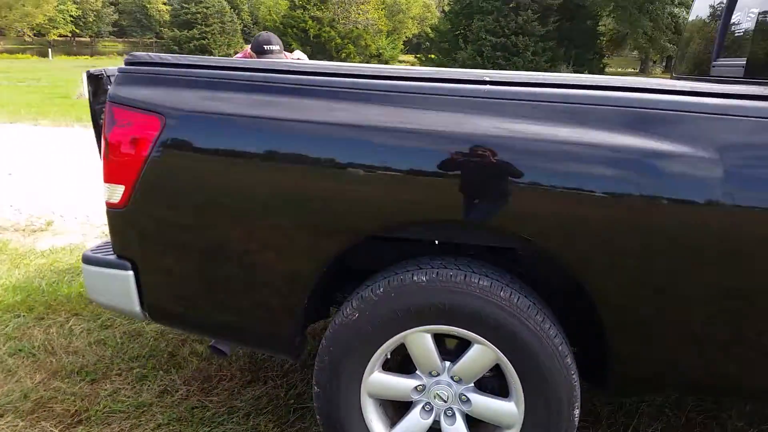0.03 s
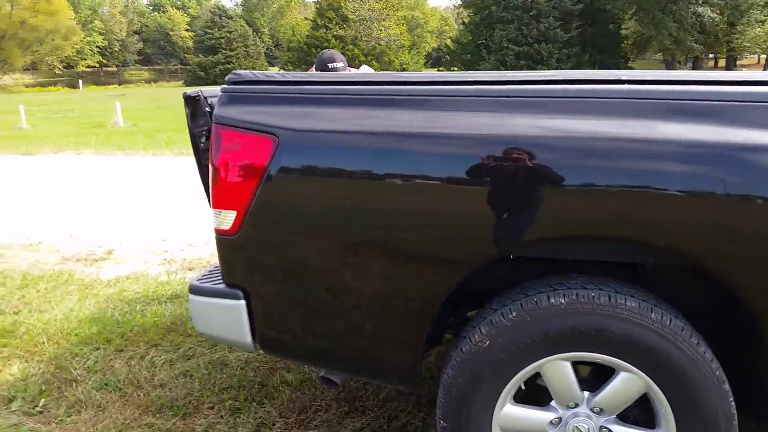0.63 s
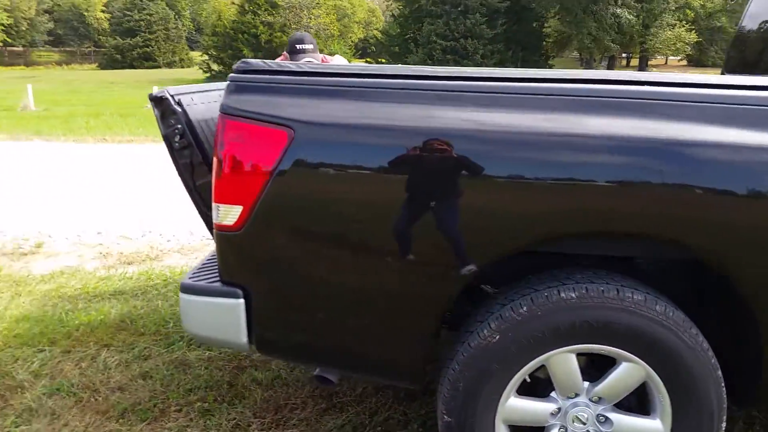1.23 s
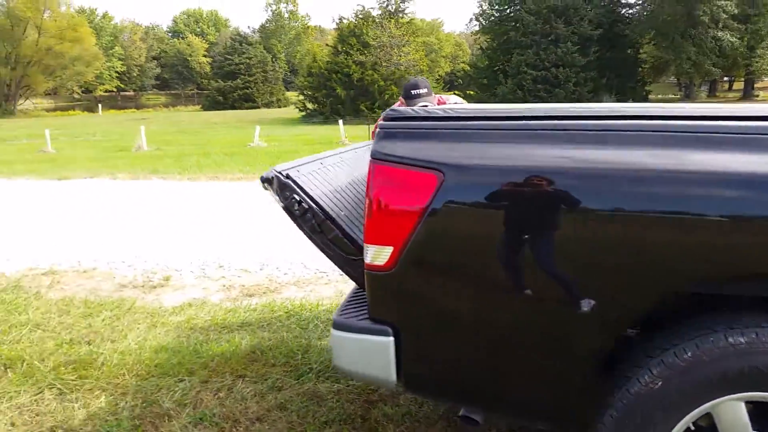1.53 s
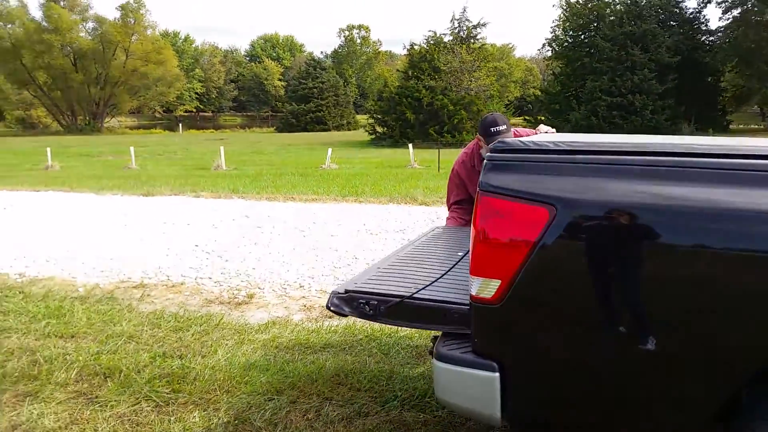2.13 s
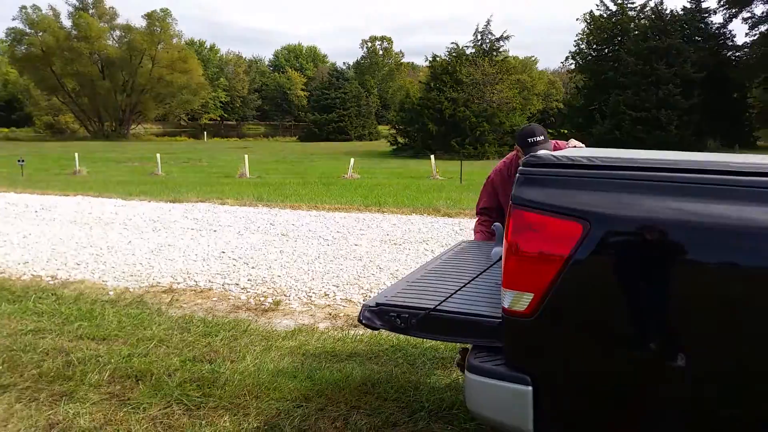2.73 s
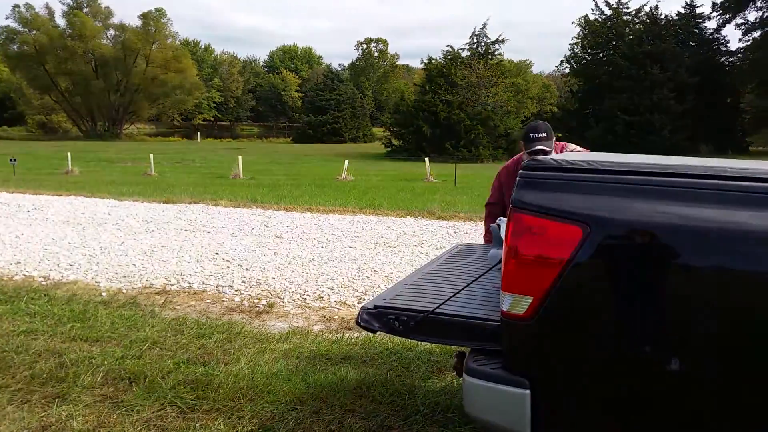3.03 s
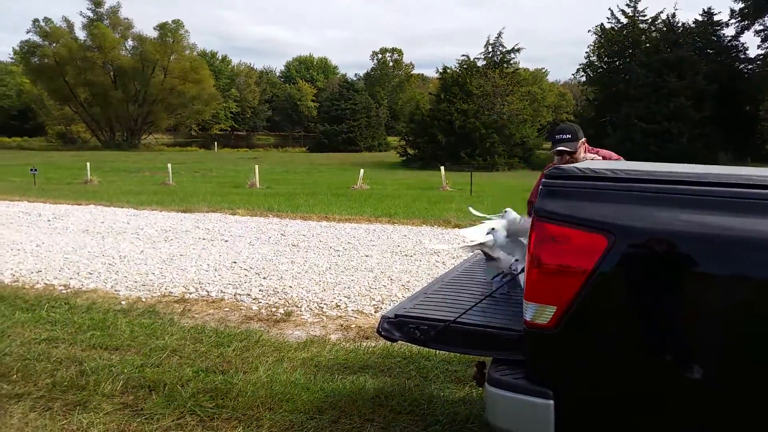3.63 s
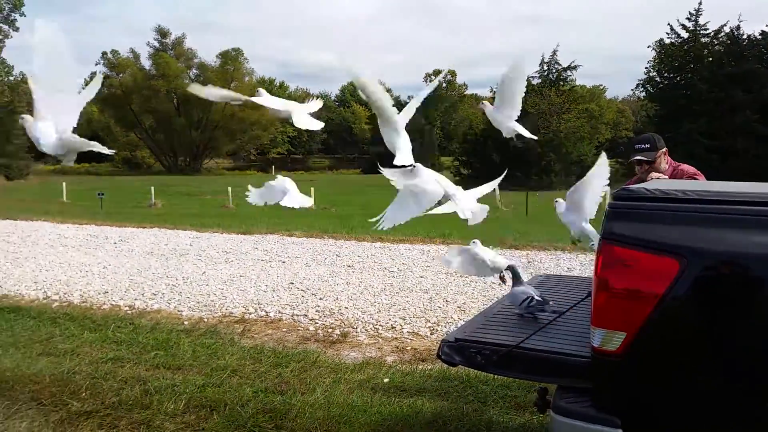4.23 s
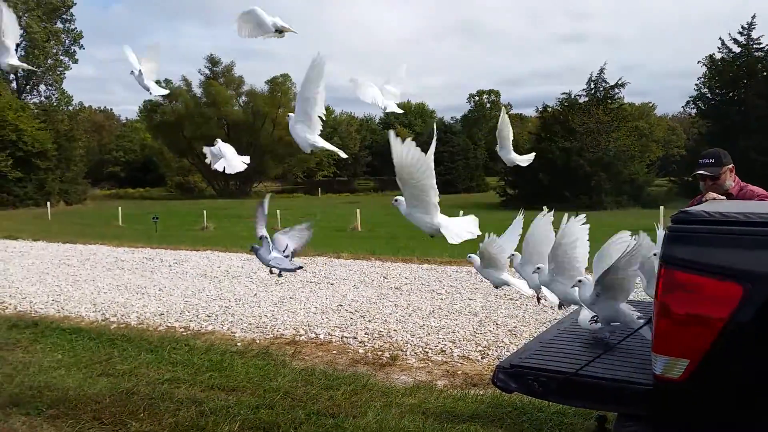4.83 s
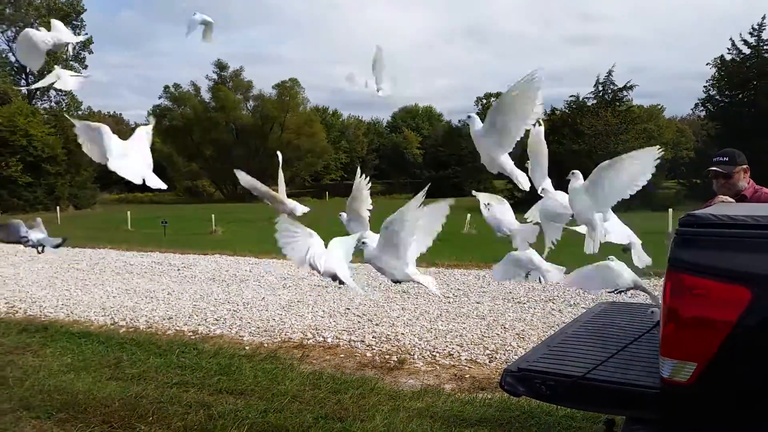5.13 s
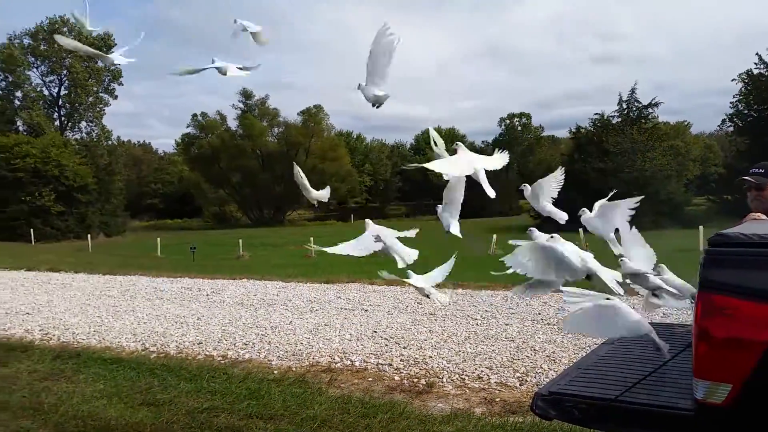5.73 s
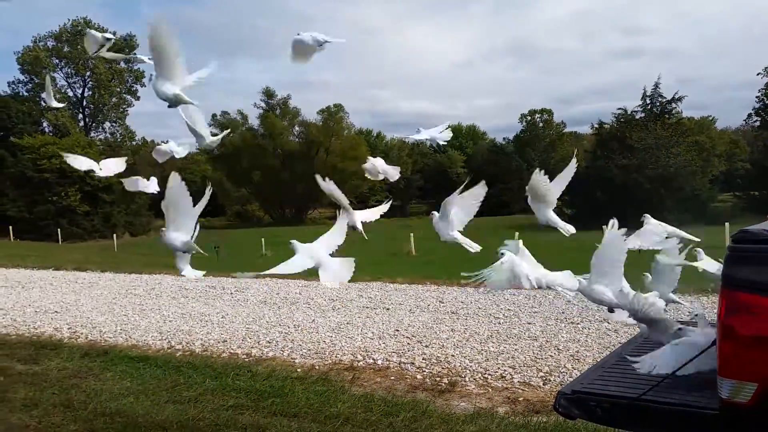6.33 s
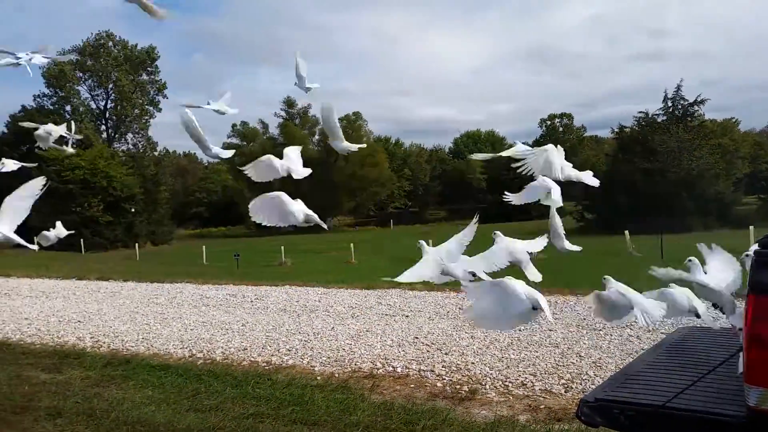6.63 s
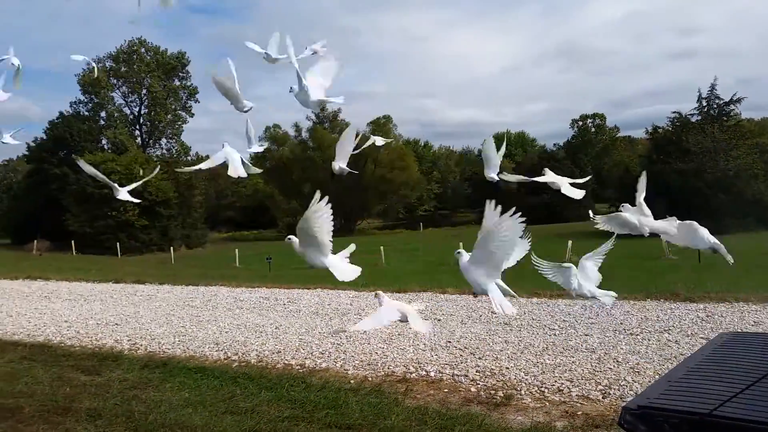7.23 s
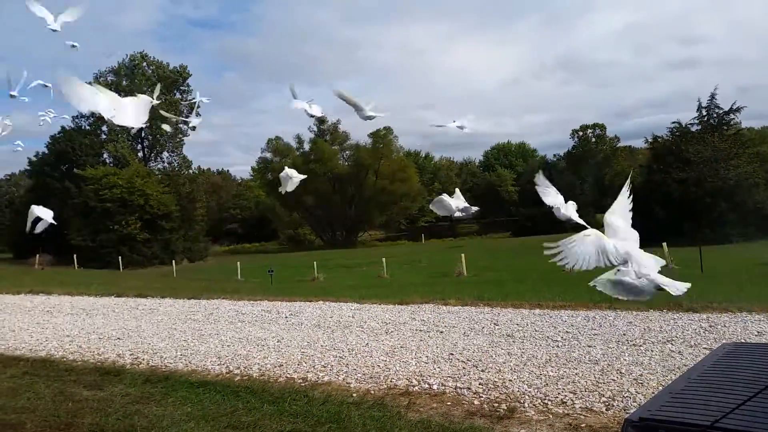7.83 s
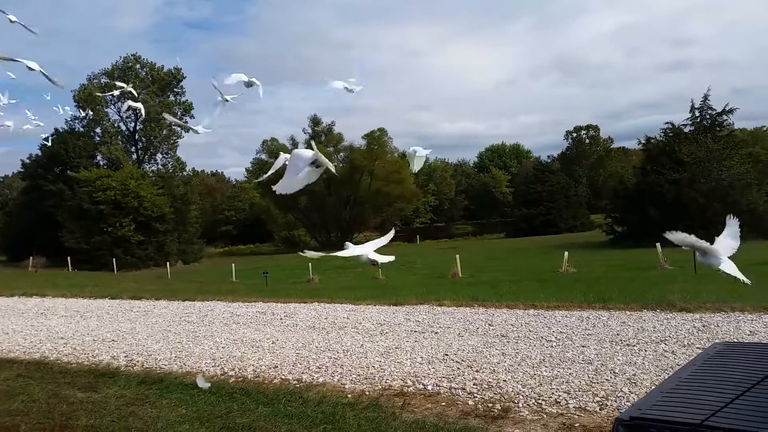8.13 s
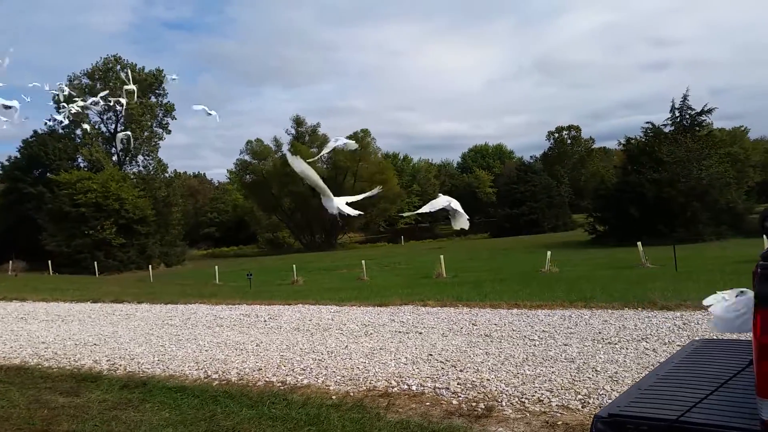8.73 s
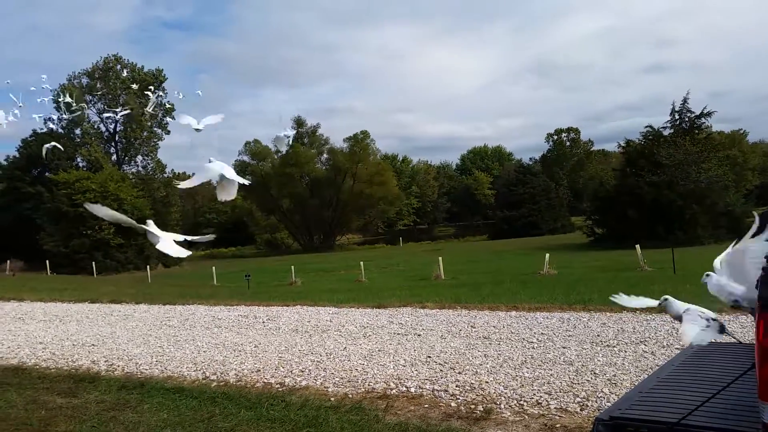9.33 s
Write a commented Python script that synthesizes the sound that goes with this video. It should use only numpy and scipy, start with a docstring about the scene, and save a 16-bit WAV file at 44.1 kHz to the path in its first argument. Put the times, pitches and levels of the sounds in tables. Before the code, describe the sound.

Wind buffets the microphone outdoors while a tailgate knocks, then a flock of doves bursts out with dense flapping and sharp wing claps.

```python
"""A flock of doves bursts out of a pickup's bed: feathers hiss, wings push air, wing tips clap.
Before that, steps swish through the lawn, small metal parts clink and the lowered tailgate knocks to rest.
Gusts sweep eddies past the two ports of a handheld microphone throughout; one port sounds full,
the other thin and glassy. Far trees and faint insects lie underneath."""
import sys
import numpy as np
from scipy import signal
from scipy.fft import rfft, irfft, next_fast_len
from scipy.io import wavfile
from scipy.ndimage import uniform_filter1d

SR = 44100
rng = np.random.default_rng(int(sys.argv[2]) if len(sys.argv) > 2 else 0)


def dump_mix(stems):
    """Bounce the given channels to the path in sys.argv[1] as a 16-bit WAV at rate SR."""
    frames = np.atleast_2d(stems).T  # one column per channel
    limited = np.clip(frames, -1, 1)  # hard clip at full scale
    pcm = np.round(limited * 32767).astype(np.int16)
    wavfile.write(sys.argv[1], SR, pcm)


N = 414099
TIME = np.arange(N) / SR


# birds leaving in waves: t/s, level/dB
FLOCK_LEVEL = [(3.681, -52), (3.85, -36.5), (4.03, -31.5), (4.7, -33.5), (5.13, -30), (5.5, -30),
               (6.101, -39.5), (6.42, -33.5), (6.72, -37), (7.2, -29.5), (7.64, -33), (8.1, -42),
               (8.56, -52.5), (8.74, -46.5), (9.1, -55), (9.39, -51)]
# feather hiss: f/Hz, density/dB
FEATHER_SPECTRUM = [(700, -30), (1800, -2), (3500, -2), (7000, -2.5), (16000, -4.5)]
# air pushed by the wings: f/Hz, density/dB
PUFF_SPECTRUM = [(80, -7.5), (250, 11), (430, 1.5), (720, 4), (1000, -2.5), (2200, -9.5), (6000, -16)]

def flock(hiss_gain_db=3, air_gain_db=1.5, flick_s=0.001, sweep_s=0.016, puff_s=0.0086, full_db=-32):
    """Each stroke flicks the quills, sweeps the feathers over one another and pushes a puff of air."""
    hiss_db = on_timeline(FLOCK_LEVEL)
    air_db = full_db + 0.81 * (hiss_db - full_db)  # swells less than the hiss
    airborne = np.interp(TIME, [3.6, 3.76], [0, 1])
    strokes = wingbeats()
    far_birds = .35 * strokes.mean()
    rustle = decay(0.15 * strokes + decay(strokes, sweep_s), flick_s) + far_birds
    barbs = grain(depth_db=5, tau_s=0.0022)  # feather edges catch and slip
    hiss = colour(air_noise() * np.sqrt(rustle) * barbs, FEATHER_SPECTRUM)
    hiss = even_out(unit_rms(hiss), span_s=0.048)
    puffs = np.sqrt(decay(decay(strokes, puff_s), flick_s) + far_birds)
    air = colour(air_noise(alike_below_hz=1460) * puffs, PUFF_SPECTRUM)
    air = even_out(unit_rms(air), span_s=0.067)
    return airborne * (from_db(hiss_db + hiss_gain_db) * hiss + from_db(air_db + air_gain_db) * air)


def wingbeats(birds=7, beat_hz=8.5, spread_db=3.5):
    """One power impulse per downstroke of the nearest birds, each on its own uneven beat."""
    strokes = np.zeros(N)
    for _ in range(birds):
        jitter, size = rng.standard_normal((2, N // SR * 20))
        beats = np.cumsum(1 + 0.0738 * jitter) - rng.random()
        at = (beats * SR / (beat_hz * rng.uniform(.85, 1.15))).astype(int)
        heard = (at >= 0) & (at < N)
        strokes[at[heard]] += from_db(spread_db * size[heard]) ** 2
    return strokes


# loudest wing claps: t/s, level/dB, crack decay/s
WING_CLAPS = [(3.7542, -19.5, 0.0005), (3.902, -19, 0.00055), (4.0038, -14, 0.0005), (4.0478, -12, 0.00051),
              (4.0976, -10, 0.00055), (4.24, -7, 0.00055), (4.2608, -8, 0.00055), (4.3352, -9.5, 0.00048),
              (4.4815, -12, 0.00055), (4.561, -12.5, 0.00063), (4.586, -12.5, 0.00061),
              (4.6722, -9.5, 0.00055), (4.8295, -10, 0.00055), (4.9141, -9.5, 0.00055),
              (4.9836, -10, 0.00055), (5.057, -12, 0.00041), (5.3133, -12, 0.00048),
              (5.5001, -10.5, 0.00044), (5.7395, -14, 0.00059), (5.8245, -11, 0.00046),
              (6.0415, -12, 0.00061), (6.871, -13.5, 0.00055), (6.927, -15, 0.00046),
              (6.9988, -8.5, 0.00044), (7.1933, -11.5, 0.00055), (7.2624, -10.5, 0.0006),
              (7.3327, -10, 0.00055), (7.3781, -14, 0.00055), (7.477, -13.5, 0.0006),
              (7.651, -15.5, 0.00072), (7.7937, -11, 0.00055), (7.897, -14.5, 0.00042),
              (7.9473, -15, 0.00048), (8.1295, -14, 0.00046), (8.1998, -21.5, 0.00049),
              (8.411, -24.5, 0.00055), (8.4414, -23, 0.00065), (8.8545, -26, 0.00055),
              (9.068, -28.5, 0.00055)]
# crack and rustle: f/Hz, gain/dB
CLAP_SPECTRUM = [(300, -3.5), (2000, -9), (5000, 5), (16000, 1)]
# air trapped between wings: f/Hz, density/dB
SLAP_SPECTRUM = [(100, -5), (280, 0.5), (700, 4.5), (1100, -3), (2300, 1.5), (5000, -18.5)]

def wing_claps(gain_db=6, pan_db=2, rustle_s=0.003, echo_s=0.0038, echo_db=-13, slap_s=0.0077):
    """Wing tips meet: a crack, a rustle, a hollow slap of trapped air, an echo off gate or ground."""
    cracks, slaps, t = np.zeros((2, N)), np.zeros(N), TIME[:SR // 20]
    noise = air_noise()
    claps = list(WING_CLAPS) + light_claps()
    draws = rng.standard_normal((N // len(t), 3))
    for k, ((start, db, crack_s), (path, cupped, pan)) in enumerate(zip(claps, draws)):
        power = np.exp(-2 * t / crack_s) + 0.031 * np.exp(-t / rustle_s)
        bursts = np.sqrt(power) * noise[:, k * len(t):(k + 1) * len(t)]
        add(slaps, start, from_db(db - 19 + 3 * cupped) * np.exp(-t / slap_s))
        for side, burst, sign in zip(cracks, bursts, (1, -1)):
            burst = from_db(db + gain_db + sign * pan_db * pan) * burst / np.abs(burst).max()
            add(side, start, burst)
            add(side, start + echo_s * np.exp(0.23 * path), from_db(echo_db) * burst)
    return colour(cracks, CLAP_SPECTRUM) + slaps * unit_rms(colour(noise, SLAP_SPECTRUM))


def light_claps(per_s=8.4, boost_db=15.5, spread_db=2, crack_s=0.0014, step_s=0.01):
    """Lighter wing touches at random, following the flock's level; rows as in WING_CLAPS."""
    times, levels = np.transpose(FLOCK_LEVEL)
    slots = np.arange(times[0], times[-1], step_s)
    chances, sizes = rng.random(N // 100), rng.standard_normal(N // 100)
    return [(start, np.interp(start, times, levels) + boost_db + spread_db * size, crack_s)
            for start, chance, size in zip(slots, chances, sizes) if chance < per_s * step_s]


# tailgate, crate and birds hitting the panel: t/s, ring/dB, thud/dB, scrape/dB, rattle decay/s
PANEL_KNOCKS = [(1.074, -43, -41, -47, 0.053), (2.076, -37, -45, -60, 0.026),
                (2.297, -36.5, -20, -36.5, 0.033), (2.419, -49, -34, -38, 0.012),
                (2.771, -48, -40, -43, .025), (3.543, -33, -53, -41, 0.016), (3.595, -41, -42, -40, 0.038),
                (3.87, -27, -39, -55, 0.017), (4.041, -22, -32, -45, 0.012), (5.006, -23, -33, -50, 0.02),
                (5.12, -16.5, -34, -50, 0.0095)]
# upper panel modes: f/Hz, width/Hz, level/dB
RING_MODES = [(686, 49, -6), (1120, 71, 0), (1620, 500, -4.5), (1930, 400, -0.5), (2810, 580, -3.5),
              (4700, 920, -8.5)]
# low panel modes: f/Hz, width/Hz, level/dB
THUD_MODES = [(118, 10, -1), (188, 23, -0.5), (261, 24, 2.5), (330, 69, -2)]
# grit in the hinges and on the bed: f/Hz, density/dB
GRIT_SPECTRUM = [(2000, -15), (7000, 0.5), (14000, 0)]

def knocks(rise_s=0.0019):
    """Loose parts rattle and scrape briefly against the panel, which booms underneath."""
    rattle, thud, scrape = np.zeros((3, N))
    t = TIME[:SR // 2]
    for start, ring_db, thud_db, scrape_db, decay_s in PANEL_KNOCKS:
        add(rattle, start, from_db(ring_db) * np.exp(-t / decay_s))
        add(thud, start, from_db(thud_db) * np.exp(-t / (2 * decay_s)))
        add(scrape, start, from_db(scrape_db) * np.exp(-t / decay_s))
    return (decay(rattle, rise_s) * unit_rms(resonate(air_noise(), RING_MODES))
            + decay(thud, rise_s) * unit_rms(resonate(air_noise(), THUD_MODES))
            + decay(scrape, rise_s) * unit_rms(colour(air_noise(), GRIT_SPECTRUM)))


# small metal parts touching: t/s, level/dB, t60 multiplier
METAL_TOUCHES = [(.208, -36, 2.1), (.25, -36, 3), (.863, -23, .8), (1.022, -26, .9)]
# their modes: f/Hz, level/dB, base t60/s
METAL_MODES = [(7700, -24, 0.055), (10260, -17, .06), (13600, -3, 0.043), (15750, -3, 0.053)]

def clinks(spread_db=2.5):
    """Each touch rings every mode of the metal with a strength of its own."""
    out, t = np.zeros(N), TIME[:SR // 2]
    for start, db, stretch in METAL_TOUCHES:
        for hz, mode_db, t60 in METAL_MODES:
            strength = from_db(db + mode_db + rng.normal(0, spread_db))
            envelope = from_db(-60 * t / (stretch * t60))
            add(out, start, strength * envelope * np.sin(2 * np.pi * hz * t))
    return out


# legs brushing grass: t/s, length/s, level/dB
LEG_SWISHES = [(0, 0.14, -48.5), (.55, 0.16, -46.5), (1.17, 0.036, -42.5), (1.3, .24, -55.5),
               (1.75, .09, -53), (2.02, 0.075, -54.5)]
# sliding blades: f/Hz, density/dB
GRASS_SPECTRUM = [(300, -13), (900, -8), (2300, -6), (4400, -4.5), (6500, -14), (8000, -2), (12000, -3),
                  (15500, 1.5)]

def grass(gain_db=11):
    """Blades slide over shoes and trousers with every step, until the walker comes to rest."""
    blades = grain(depth_db=2, tau_s=0.0098)
    walking = from_db(-54.5) * np.interp(TIME, [1.9, 2.5, 3.6], [1, .33, .05])
    brushing = np.hypot(walking, swells(LEG_SWISHES, attack_s=.04, release_s=0.062))
    return brushing * from_db(gain_db) * unit_rms(colour(air_noise() * blades, GRASS_SPECTRUM))


# gusts on the ports: t/s, length/s, left/dB, right/dB
PORT_GUSTS = [(0, 0.15, -24.5, -23), (0.182, 0.15, -22.5, -22), (0.388, 0.086, -23, -17.5),
              (0.491, 0.17, -14.5, -33), (.65, 0.16, -18, -32), (1.007, 0.028, -16.5, -43),
              (1.209, .19, -30, -23), (1.618, 0.1, -23, -29), (1.838, .14, -15.5, -42),
              (2.012, 0.056, -17.5, -17), (2.125, 0.074, -18.5, -43), (2.295, 0.038, -14.5, -19),
              (2.575, 0.028, -9.5, -13.5), (2.886, 0.12, -24, -17.5), (3.118, 0.058, -19, -15.5),
              (3.276, 0.11, -11.5, -29), (3.437, 0.14, -33, -15.5), (3.653, 0.069, -10.5, -42),
              (3.76, 0.2, -21.5, -31), (4.137, 0.15, -12.5, -35), (4.62, 0.043, -20, -36),
              (5.164, 0.048, -15.5, -23), (5.661, 0.436, -13, -16), (6.164, 0.093, -24, -24.5),
              (6.35, 0.044, -13, -27), (6.703, 0.029, -26, -14), (7.76, 0.026, -15.5, -36),
              (7.873, 0.2, -14, -19.5), (8.14, 0.56, -12.5, -35), (8.62, 0.11, -19, -21),
              (8.973, 0.23, -13.5, -28), (9.288, 0.095, -10, -18)]
# breeze between gusts: t/s, level/dB
BREEZE_LEVEL = [(0, -33), (.8, -28.5), (.93, -36), (1.6, -33), (2.4, -27.5), (2.8, -29.5), (4.1, -26.5),
                (4.9, -30), (5.3, -26), (6.8, -31.5), (8.9, -20.5), (9.39, -32.5)]

def wind(port, shelter_db=0, gain_db=.5, usual_db=-19, calm_db=-29, gust_s=0.36, flutter_hz=800):
    """Gusts over a breeze buffet one port (0 left, 1 right); sustained gusts sound higher."""
    breeze_db = on_timeline(BREEZE_LEVEL)
    gusts = swells(np.array(PORT_GUSTS)[:, [0, 1, 2 + port]], attack_s=0.013, release_s=0.011)
    pressure = np.hypot(gusts, from_db(breeze_db + shelter_db)) * from_db(gain_db)
    sustained_db = 20 * np.log10(uniform_filter1d(pressure, int(gust_s * SR)) + 1e-9)
    excess_db = sustained_db - usual_db + 0.33 * (breeze_db - calm_db)  # a stiff breeze adds speed
    speed = np.minimum(from_db(0.59 * excess_db), 2)
    swings = pressure * turbulence(speed) + buffets(pressure)
    # in a sustained gust the hardest swings tear off at the port's rim and flutter
    lowpass = signal.butter(6, flutter_hz, fs=SR, output="sos")
    flutter = unit_rms(signal.sosfilt(lowpass, rng.standard_normal(N)))
    return swings + flutter * np.tanh(swings) ** 2 * from_db(np.minimum(excess_db, 0) - 16)


# smooth turbulence: f/Hz, density/dB
TURBULENCE_SPECTRUM = [(20, -24.5), (45, -9), (80, -0.5), (140, -3.5), (300, -21), (750, -53),
                       (3000, -81.5)]

def turbulence(speed, count=1000, eddy_hz=125, octave_spread=0.72 / np.log(2), smooth_db=-8):
    """Random eddies ride on smooth turbulence; faster air sweeps them by quicker and more evenly."""
    smooth = unit_rms(colour(rng.standard_normal(N), TURBULENCE_SPECTRUM))
    eddies = np.zeros(N)
    for (when, phase, size), strength in zip(rng.random((count, 3)), rng.standard_normal(count)):
        at = int(when * N)
        hz = eddy_hz * speed[at] * 2 ** (octave_spread * (2 * size - 1))
        add(eddies, at / SR - 1 / 40, from_db(6.5 * strength / speed[at]) * eddy(hz, phase))
    return even_out(unit_rms(eddies) + from_db(smooth_db) * smooth, span_s=0.049)


# hardest eddies in the gusts: t/s, relative level/dB, f/Hz
HARD_EDDIES = [(.076, 5.5, 197), (.474, 3.5, 227), (1.936, 6.5, 132), (2.144, 9, 221), (2.594, 0, 213),
               (3.361, 0, 160), (3.386, -1, 250), (4.171, 2.5, 131), (5.687, 3.5, 290), (5.802, 6, 149),
               (5.94, 6, 245), (6.368, 4, 165), (8.021, 5, 230), (8.257, -3, 150), (8.419, 4, 185),
               (8.486, 2.5, 200), (9.1, -0.5, 290), (9.302, 0.5, 290)]

def buffets(pressure, gain_db=-2.5, shed_db=-9, scatter_s=0.0121):
    """Each big eddy hits the port and sheds three weaker ones."""
    out = np.zeros(N)
    for centre_s, db, hz in HARD_EDDIES:
        start = centre_s - 1 / 40
        strength = pressure[int(centre_s * SR)] * from_db(db + gain_db) * np.sqrt(SR / 50)
        add(out, start, strength * eddy(hz, rng.random()))
        for lag, size, phase in rng.uniform(-1.016, 1, size=(3, 3)):
            shed = from_db(shed_db) * eddy(hz * np.exp(0.72 * size), phase)
            add(out, start + scatter_s * lag, strength * shed)
    return out


def eddy(hz, phase, width_cycles=0.44):
    """Pressure swing of one eddy crossing a port; unit energy, centred 1/40 s in."""
    t = TIME[:SR // 20] - 1 / 40
    swing = np.exp(-.5 * (t * hz / width_cycles) ** 2) * np.sin(2 * np.pi * (hz * t + phase))
    return swing / np.sqrt(np.sum(swing ** 2))


# trees and insects: f/Hz, density/dB
FIELD_SPECTRUM = [(400, 5), (730, 4), (1100, -5), (2200, -10.5), (3300, -12.5), (4300, -7), (6600, -30),
                  (8700, -14.5), (10500, -22), (16000, -30)]

def field(level_db=-46):
    """Steady noise of far trees and a faint band of insects."""
    return from_db(level_db) * unit_rms(colour(air_noise(alike_below_hz=700), FIELD_SPECTRUM))


def from_db(db):
    return 10 ** (np.asarray(db) / 20)


def unit_rms(x):
    return x / np.sqrt(np.mean(x ** 2) + 1e-20)


def on_timeline(rows):
    return np.interp(TIME, *np.transpose(rows))


def add(track, start_s, piece):
    at = max(int(start_s * SR), 0)
    track[at:at + len(piece)] += piece[:max(N - at, 0)]


def decay(x, tau_s):
    """Every impulse dies away exponentially; its area is kept."""
    pole = np.exp(-1 / (tau_s * SR))
    return signal.lfilter([1 - pole], [1, -pole], x + 1e-18)


def grain(depth_db, tau_s):
    """Randomly flickering gain."""
    return from_db(depth_db * unit_rms(decay(rng.standard_normal(N), tau_s)))


def swells(rows, attack_s, release_s):
    """Amplitude of events that rise, hold and die away; their powers add."""
    power, t = 0, TIME[::20]
    for start, length, db in rows:
        rise = np.maximum(start - t, 0) / attack_s
        fall = np.maximum(t - start - length, 0) / release_s
        power = power + (from_db(db) * np.exp(-rise - fall)) ** 2
    return np.interp(TIME, t, np.sqrt(power))


def even_out(x, span_s):
    """Divides out the slow level and keeps the quick texture."""
    size = int(span_s * SR)
    power = uniform_filter1d(uniform_filter1d(x ** 2, size), size)
    return x / np.sqrt(np.abs(power) + 1e-9)


def air_noise(alike_below_hz=1100):
    """Noise at two ports, shared in the bass and unrelated in the treble."""
    mid, side = rng.standard_normal((2, N))
    side = signal.sosfilt(signal.butter(1, alike_below_hz, "high", fs=SR, output="sos"), side)
    return unit_rms(np.array([mid + side, mid - side]))


def colour(x, spectrum):
    """Minimum-phase filter with the given response."""
    size = 2 * next_fast_len(x.shape[-1] // 2 + SR // 10)
    hz, db = np.transpose(spectrum)
    grid_hz = np.maximum(np.arange(size // 2 + 1) * SR / size, 1)
    gain = from_db(np.interp(np.log(grid_hz), np.log(hz), db))
    cepstrum = irfft(np.log(gain))
    cepstrum[1:size // 2] *= 2
    cepstrum[size // 2 + 1:] = 0
    return irfft(rfft(x, size) * np.exp(rfft(cepstrum)))[..., :x.shape[-1]]


def resonate(x, modes):
    """Parallel resonances of alternating sign."""
    out = 0
    for k, (hz, width_hz, db) in enumerate(modes):
        r = np.exp(-np.pi * width_hz / SR)
        ring = signal.lfilter([1, 0, -1], [1, -2 * r * np.cos(2 * np.pi * hz / SR), r * r], x)
        out = out + (-1) ** k * from_db(db) * (1 - r * r) / 2 * ring
    return out


# full left port: f/Hz, gain/dB
LEFT_RESPONSE = [(300, 0), (2300, 2), (3300, -2), (4400, 0), (6500, 1), (8000, 3), (9000, -5.5),
                 (10200, -10.5), (12300, -5.5), (15600, -6.5)]
# thin, glassy right port: f/Hz, gain/dB
RIGHT_RESPONSE = [(300, -2), (1000, -6), (1600, -5), (2300, -12.5), (3300, -15.5), (6300, -23.5),
                  (8000, -18.5), (9000, -12.5), (10200, -9.5), (11200, 1), (12300, 7), (14000, -0.5),
                  (15600, -2.5)]

def scene():
    """Each port colours the airborne sound in its own way and catches its own wind."""
    left, right = flock() + wing_claps() + grass() + clinks() + knocks() + field()
    return np.array([colour(left, LEFT_RESPONSE) + wind(port=0),
                     colour(right, RIGHT_RESPONSE) + wind(port=1, shelter_db=-1.5)])


def record(dry):
    """The strongest peaks are rounded off, and the top is cut."""
    ceiling, cutoff_hz = .95, 15900
    rounded = dry / (1 + (dry / ceiling) ** 4) ** (1 / 4)
    return signal.sosfilt(signal.ellip(10, .1, 80, cutoff_hz, fs=SR, output="sos"), rounded)


dry = scene()
out = record(dry)
dump_mix(out)
```